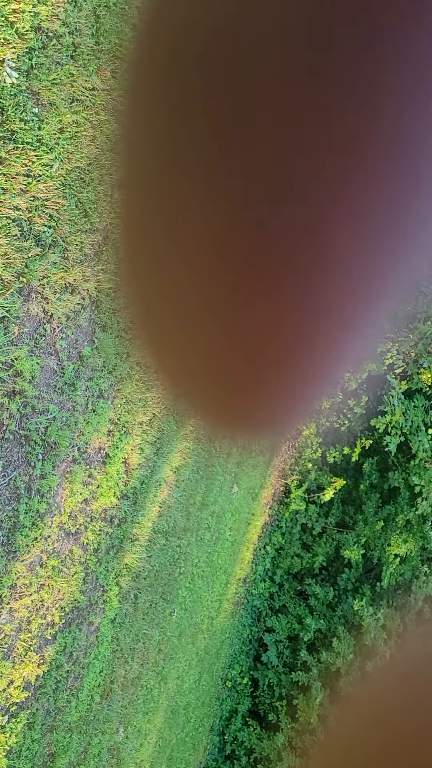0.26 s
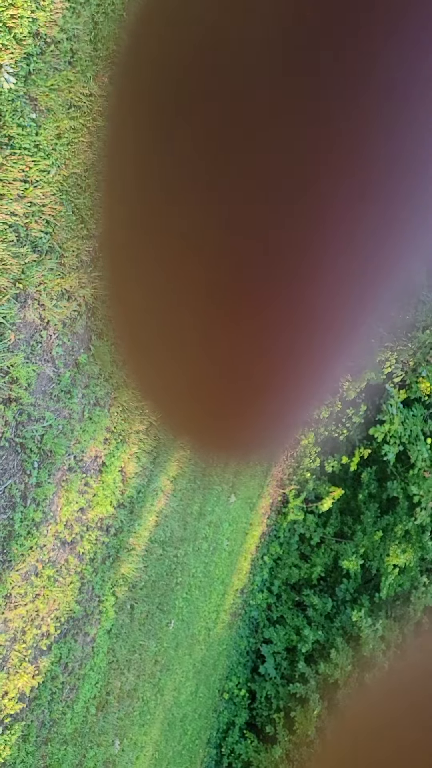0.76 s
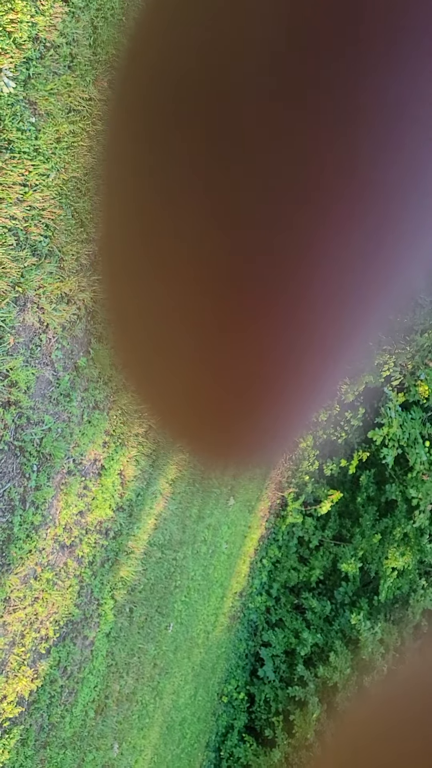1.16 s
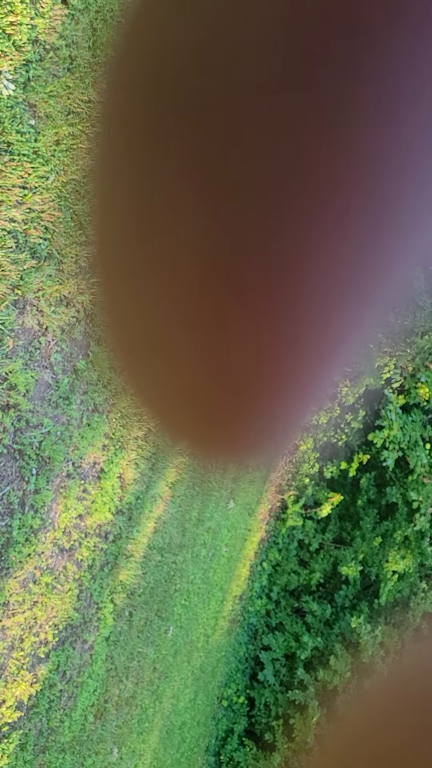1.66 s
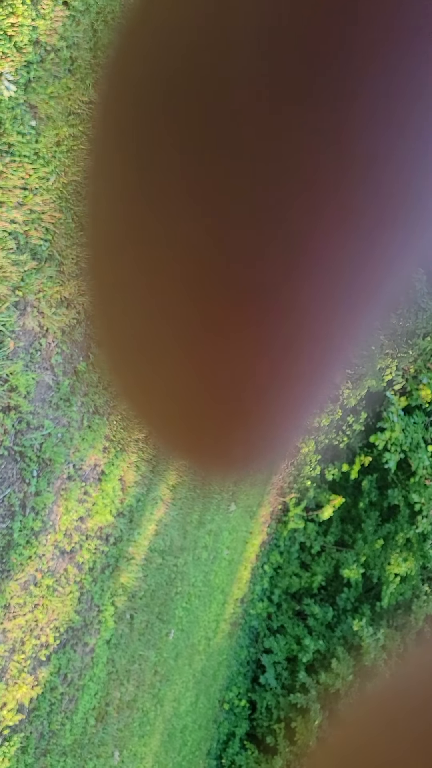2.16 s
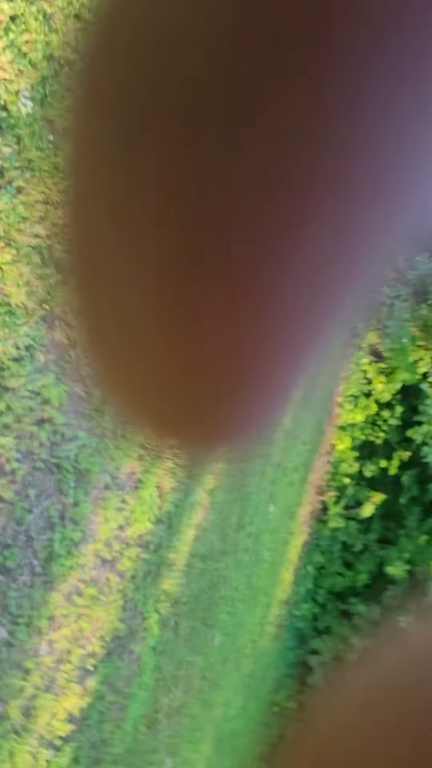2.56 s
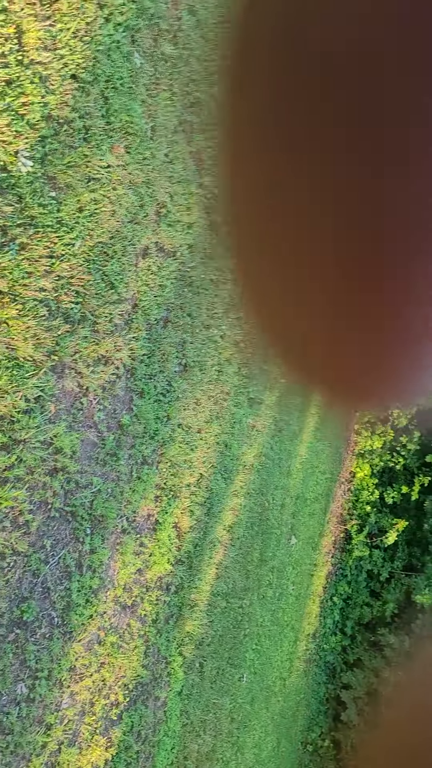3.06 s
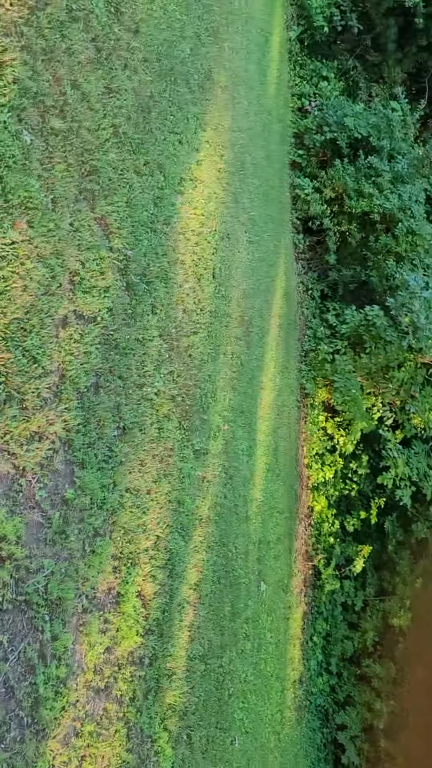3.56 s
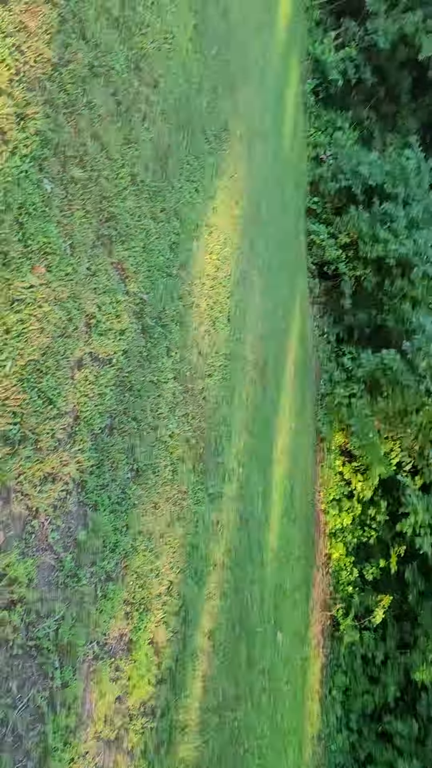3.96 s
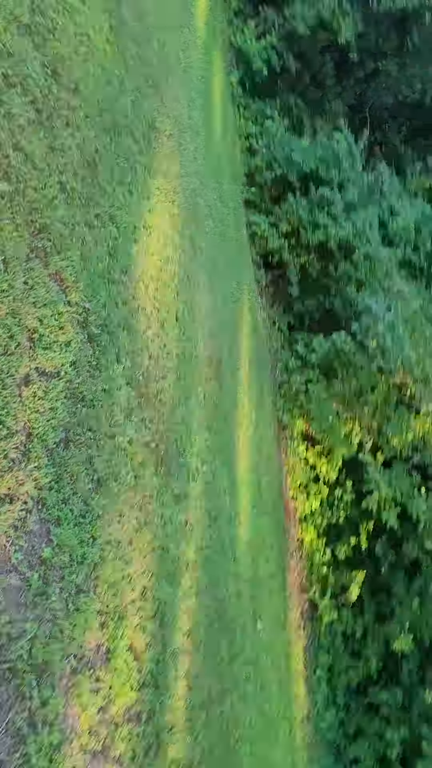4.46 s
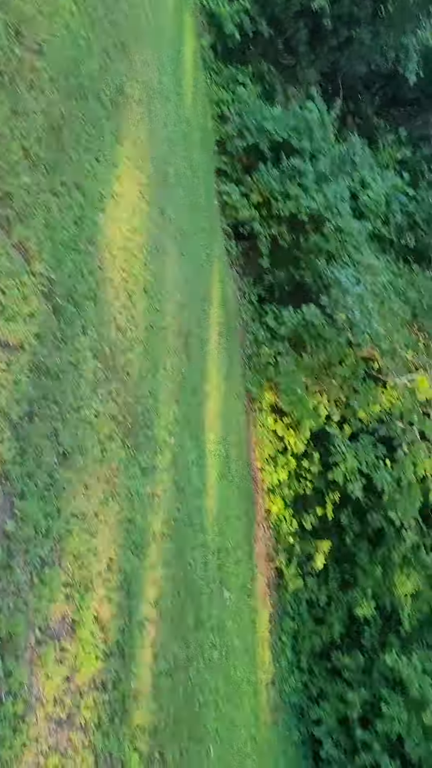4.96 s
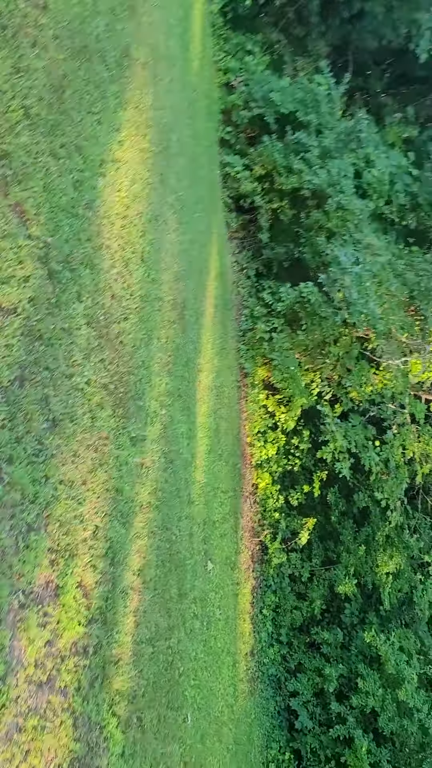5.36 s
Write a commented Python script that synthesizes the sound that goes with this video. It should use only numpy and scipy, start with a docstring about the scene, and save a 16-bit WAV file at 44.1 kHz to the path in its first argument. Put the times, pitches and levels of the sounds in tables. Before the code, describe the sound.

Fingers knock, rub and thump softly on a handheld phone's microphone in a quiet field, with faint birds far away.

```python
'''A phone is held above a quiet field at the edge of a wood: open air, a low hum, a thin high hiss.
Far birds whistle, trill and caw, scattered by the trees, and a faint plink sounds near 1 s.
From 2.6 s the hand changes its grip: fingers knock on the case, stick and slip over it with a dry
rustle and press soft thumps of air into the two microphone ports. Near 5 s a cupped palm rubs
over the left port, and a second plink comes with the last touches.'''
import sys
import numpy as np
from scipy import signal
from scipy.io import wavfile

SR = 44100
rng = np.random.default_rng(int(sys.argv[2]) if len(sys.argv) > 2 else 0)


def waveform_to_disk(signal):
    """Save audio, clipped to [-1, 1], as 16-bit WAV at the path in sys.argv[1]."""
    frames = np.transpose(np.atleast_2d(signal))
    scaled = np.clip(frames, -1, 1) * 32767
    samples = np.round(scaled).astype(np.int16)
    wavfile.write(sys.argv[1], SR, samples)


N = 247479
TIME = np.arange(N) / SR
HIT_TIME = TIME[:SR // 25]   # 40 ms, room for one knock, tick or plink
HIT_GAIN = np.sqrt(.01 * SR)   # brings a hit of unit energy to an rms of one over 10 ms


def from_db(db):
    """Decibels to gain."""
    return 10 ** (np.asarray(db) / 20)


def rms_one(x):
    """Scale to an rms of one."""
    return x / np.sqrt(np.mean(x ** 2) + 1e-20)


def unit_energy(x):
    """Scale each channel to an energy of one."""
    return x / np.linalg.norm(x, axis=-1, keepdims=True)


def in_time(rows):
    """Read each column of an automation curve at every sample."""
    time_s, *columns = np.transpose(rows)
    return [np.interp(TIME, time_s, column) for column in columns]


def at_hz(points, hz):
    """Read a spectrum on a log-frequency axis."""
    freq_hz, value = np.transpose(points)
    return np.interp(np.log(hz), np.log(freq_hz), value)


def lowpass(x, cutoff_hz, order=2):
    """Roll off the treble."""
    return signal.sosfilt(signal.butter(order, cutoff_hz, fs=SR, output="sos"), x)


def band(x, low_hz, high_hz, order=2):
    """Band-pass between two edges."""
    return signal.sosfilt(signal.butter(order, [low_hz, high_hz], "band", fs=SR, output="sos"), x)


def resonance(x, centre_hz, width_hz, order=2):
    """Band-pass around a centre."""
    return band(x, centre_hz - width_hz / 2, centre_hz + width_hz / 2, order)


def panned(pan_db):
    """Constant-power stereo gains; pan_db is left over right."""
    gains = from_db(np.array([[.5], [-.5]]) * pan_db)
    return gains / np.sqrt(np.mean(gains ** 2, axis=0))


def drift(rate_hz):
    """A random wander with an rms of one."""
    knots = rng.standard_normal(int(rate_hz * N / SR) + 3)
    return rms_one(np.interp(TIME * rate_hz, np.arange(len(knots)), knots))


def add(out, start_s, sound):
    """Mix a short sound into the stereo track."""
    start = int(start_s * SR)
    out[:, start:start + sound.shape[1]] += sound[:, :N - start]


def banded_noise(spectrum, likeness, flicker_db, flicker_hz):
    """Stereo noise in narrow bands, each with its own level, flicker and left-right likeness; rms one."""
    bottom_hz, top_hz = spectrum[0][0], spectrum[-1][0]
    edges = np.geomspace(bottom_hz, top_hz, int(np.log2(top_hz / bottom_hz) * 2.5) + 2)
    out, white = 0, rng.standard_normal((2, 2, N))
    for k, (low_hz, high_hz) in enumerate(zip(edges, edges[1:])):
        mid, side = band(white[k % 2], low_hz, high_hz, order=3)
        centre_hz = np.sqrt(low_hz * high_hz)
        alike = at_hz(likeness, centre_hz)
        gain = from_db(at_hz(spectrum, centre_hz) + flicker_db * drift(flicker_hz))
        out = out + gain * (np.sqrt(1 + alike) * mid + np.sqrt(1 - alike) * side * [[1], [-1]])
    return rms_one(out)


def open_air(wash_db=-63.5, hum_width_hz=20):
    """The bed: a steady wash of far noise, a low hum and thin, steady bands of high hiss."""
    wash_colour = [(25, -2.5), (70, -1.5), (170, -2), (310, -9), (820, -9), (1500, -25), (2500, -21.5),
                   (4600, -27.5), (6200, -40.5), (7200, -70), (15500, -47)]   # spectrum of the open air: freq_hz, relative_db
    wash_likeness = [(60, 0.84), (200, 0.43), (450, 0.059), (900, -0.41)]   # its stereo image: freq_hz, correlation
    hum_bands = [(78, -69.5), (154, -69.5)]   # the far hum: centre_hz, level_db
    hiss_bands = [(3320, 900, -77.5), (5570, 1000, -81), (8580, 1100, -97.5)]   # thin bands of high hiss: centre_hz, width_hz, level_db
    hum = sum(from_db(level_db) * rms_one(resonance(rng.standard_normal(N), hz, hum_width_hz, order=1))
              for hz, level_db in hum_bands)
    hiss = sum(from_db(level_db) * rms_one(resonance(rng.standard_normal((2, N)), hz, width_hz))
               for hz, width_hz, level_db in hiss_bands)
    wash = banded_noise(wash_colour, wash_likeness, flicker_db=.4, flicker_hz=10)
    return hum + hiss + from_db(wash_db) * wash


def whistles():
    """Birds whistle pure, wavering notes that sag in pitch."""
    # whistled notes: start_s, length_s, start_hz, end_hz, level_db, waver_share (of the pitch)
    notes = [(-.07, 0.26, 2656, 2589, -65, .007), (0.185, 0.21, 2610, 2540, -73, .008),
             (2.31, .2, 1440, 1360, -82, .035), (4.217, .034, 2850, 2720, -70, .025),
             (4.614, .15, 2886, 2680, -76.5, .018)]
    out = np.zeros(N)
    for start_s, length_s, start_hz, end_hz, level_db, waver_share in notes:
        progress = np.clip((TIME - start_s) / length_s, 0, 1)
        pitch_hz = (start_hz + (end_hz - start_hz) * progress) * (1 + waver_share * drift(90))
        swell = np.sqrt(2 * np.abs(np.sin(np.pi * progress)))
        out += from_db(level_db) * swell * np.sin(2 * np.pi * np.cumsum(pitch_hz) / SR)
    return out


def trill(buzz_share=0.16):
    """A bird's high, buzzing trill: a band of noise riding a falling tone."""
    glide = [(.33, 6700, -100), (.39, 6130, -77.5), (.45, 5320, -73), (.72, 4866, -80), (.95, 4460, -90)]   # path of the trill: time_s, centre_hz, level_db
    centre_hz, level_db = in_time(glide)
    buzz = lowpass(rng.standard_normal(N), buzz_share * centre_hz.mean(), order=3)
    tone = np.sin(2 * np.pi * np.cumsum(centre_hz) / SR)
    singing = (TIME > glide[0][0]) & (TIME < glide[-1][0])
    return singing * from_db(level_db) * rms_one(buzz * tone)


def caws(arch_share=0.06, rasp_share=0.0097):
    """A call of harmonics 2 to 5, coloured by the throat, that arches in pitch as it swells."""
    calls = [(0.953, 0.107, 556.5, -67), (2.243, 0.13, 571, -72.5)]   # the voice ahead of the throat: start_s, length_s, pitch_hz, level_db
    throat = [(550, -20), (1100, -18), (1650, -9), (2200, -4), (2800, -23)]   # response of the throat: freq_hz, gain_db
    out = np.zeros(N)
    for start_s, length_s, pitch_hz, level_db in calls:
        swell = np.abs(np.sin(np.pi * np.clip((TIME - start_s) / length_s, 0, 1)))
        bend = 1 + arch_share * (swell - 1) + rasp_share * drift(300)
        phase = 2 * np.pi * np.cumsum(pitch_hz * bend) / SR
        voice = sum(from_db(at_hz(throat, k * pitch_hz)) * np.sin(k * phase) for k in range(2, 6))
        out += from_db(level_db) * np.sqrt(swell) * voice
    return out


def wood(call, tail_db, t60_s=0.8):
    """Trunks and leaves scatter a call into a smooth tail, different on each side."""
    tail = unit_energy(rng.standard_normal((2, SR)) * from_db(-60 * TIME[:SR] / t60_s))
    return call + from_db(tail_db) * signal.fftconvolve(call[None], tail, axes=1)[:, :N]


def far_birds(dip_share=0.65):
    """The calls carry through the wood and reach the ports with a narrow dip in the treble."""
    calls = wood(whistles() + trill(), tail_db=6.5) + wood(caws(), tail_db=-6)
    return calls - dip_share * resonance(calls, centre_hz=4800, width_hz=320, order=1)


def plinks(ring_s=0.0047):
    """Faint single tones that die at once."""
    tones = [(.953, 947, -53), (5.510, 780, -50.5)]   # brief rings: start_s, pitch_hz, peak_db
    out, ring = np.zeros((2, N)), np.exp(-HIT_TIME / ring_s)
    for start_s, pitch_hz, peak_db in tones:
        add(out, start_s, from_db(peak_db) * ring * np.sin(2 * np.pi * pitch_hz * HIT_TIME)[None])
    return out


def wide_stereo(sound, lag_s=0.0002):
    """The sound spreads wide: the right channel is inverted and slightly later."""
    t = TIME[:len(sound)]
    return np.array([sound, -np.interp(t - lag_s, t, sound, left=0)])


def pressure(start_s, length_s, attack_s=0.0053, release_s=0.0088, arch_db=3):
    """Envelope of one stroke: it sets in quickly, presses hardest halfway and lets go."""
    t = TIME - start_s
    arch = np.sin(np.pi * np.clip(t / length_s, 0, 1)) - 2 / np.pi
    edges = np.minimum(t, 0) / attack_s - np.maximum(t - length_s, 0) / release_s
    return from_db(arch_db * arch) * np.exp(np.maximum(edges, -20))


def cupped_rubs(pan_db=9):
    """A cupped palm rubs over the left port; its friction rings in the pocket of air under it."""
    rubs = [(4.858, 0.11, -46.5), (4.942, 0.1, -42.5)]   # pushes of the palm: start_s, length_s, drive_db
    pocket_modes = [(541, 120, 1.5), (824, 190, -8), (1250, 130, -10), (2300, 290, -17.5),
                    (4130, 600, -15.5)]   # resonances of the pocket: centre_hz, width_hz, gain_db
    push = np.max([from_db(drive_db) * pressure(start_s, length_s)
                   for start_s, length_s, drive_db in rubs], axis=0)
    friction = rng.standard_normal(N)
    pocket = sum(from_db(gain_db) * rms_one(resonance(friction, hz, width_hz))
                 for hz, width_hz, gain_db in pocket_modes)
    return panned(pan_db) * wide_stereo(push * pocket)


def hollow_case(rub):
    """The cavities of the case lift a few narrow bands of a rub."""
    cavities = [(556, 450, -4), (1305, 94, -4.5), (2165, 80, -6), (3060, 120, 1)]   # their resonances: centre_hz, width_hz, gain_db
    return rub + sum(from_db(gain_db) * resonance(rub, hz, width_hz, order=1)
                     for hz, width_hz, gain_db in cavities)


def slides(grip_db=2.0, grip_hz=350, creep_pan_db=2.5, creep_fade_s=0.012):
    """Skin sticks and slips on the case; quick changes of grip roughen all bands together."""
    # finger strokes: start_s, length_s, body_db, rustle_over_body_db, hiss_over_rustle_db, pan_db
    strokes = [(2.654, 0.043, -49.5, -11.5, -10.5, 4), (3.213, 0.066, -59, -8.5, -18, 10),
               (3.31, .03, -45.5, -4, -23, 11), (3.336, 0.022, -37, -5, -15, 5),
               (3.549, 0.014, -29.5, -5, -10, 7.5), (3.648, 0.14, -48, 0.5, -6.5, 1),
               (3.852, 0.11, -45.5, -7.5, -14, 5), (3.895, 0.036, -38, -7.5, -13, 4.5),
               (4.115, 0.02, -51, 2, -10.5, -2), (4.198, 0.061, -50, -12, -13, 2.5),
               (4.289, 0.021, -45, -2, -15, 4), (4.427, 0.069, -45.5, -13, -26, -3),
               (4.465, 0.075, -38, -1.5, -15.5, 9.5), (4.71, 0.012, -38, -6, -11, 11),
               (4.858, 0.076, -52, -6.5, -12, 11), (4.952, 0.094, -50.5, -4, -12, 12.5),
               (5.128, 0.024, -51, -15, -6, 0), (5.237, 0.035, -47, -7.5, -8.5, 4.5),
               (5.306, 0.029, -59.5, 1.5, -9.5, 1.5)]
    creep_curve = [(3.6, -63), (3.74, -53.5), (4.056, -62.5), (4.4, -60), (4.542, -69), (4.776, -71.5),
                   (5.048, -61), (5.302, -63), (5.42, -61)]   # the hand creeping lightly between strokes: time_s, drive_db
    # low, middle and high colours of the friction: freq_hz, relative_db
    body_colour = [(110, -1), (190, 4), (300, -1), (520, -4.5), (1050, -10), (2100, -29)]
    rustle_colour = [(900, -5.5), (1400, -2), (2300, 2.5), (3200, -3), (4400, -4.5), (5800, -13),
                     (8000, -47)]
    hiss_colour = [(4200, 5), (6200, 13), (8000, 6), (11000, -5), (15500, -17)]
    likeness = [(100, 0.49), (220, -0.32), (500, -0.52), (1000, -0.58), (3000, -0.19)]   # stereo image of the friction: freq_hz, correlation
    creep_db, = in_time(creep_curve)
    inside_s = np.minimum(TIME - creep_curve[0][0], creep_curve[-1][0] - TIME)
    creep = from_db(creep_db) * np.clip(inside_s / creep_fade_s, 0, 1)
    # the body travels through the case to both ports, the treble favours the nearer one
    body = panned(.5 * creep_pan_db) * from_db(3) * creep
    rustle = panned(creep_pan_db) * from_db(-3.5) * creep
    hiss = panned(creep_pan_db) * from_db(-16.5) * creep
    for start_s, length_s, body_db, rustle_over_body_db, hiss_over_rustle_db, pan_db in strokes:
        lingering = pressure(start_s, length_s, release_s=0.011)   # the lows outlast the treble
        body = np.maximum(body, panned(.5 * pan_db) * from_db(body_db) * lingering)
        treble = panned(pan_db) * from_db(body_db + rustle_over_body_db) * pressure(start_s, length_s)
        rustle = np.maximum(rustle, treble)
        hiss = np.maximum(hiss, from_db(hiss_over_rustle_db) * treble)
    grip = rms_one(from_db(grip_db * drift(grip_hz)))
    body *= banded_noise(body_colour, likeness, flicker_db=1.5, flicker_hz=29)
    rustle *= banded_noise(rustle_colour, likeness, flicker_db=2.5, flicker_hz=50)
    hiss *= banded_noise(hiss_colour, likeness, flicker_db=0.5, flicker_hz=95)
    return grip * (hollow_case(body + rustle) + hiss)


def port_thumps(port_hz=74.6, quick_press_s=0.0068):
    """A fingertip closes on a port and lifts: a short, low swell of pressure."""
    presses = [(2.626, -40.5, 0.0029, 3), (2.67, -45, 0.0066, 2), (2.697, -45, 0.0016, 2),
               (3.343, -26, 0.0023, -22), (3.37, -21.5, 0.0025, 8), (3.564, -23.5, 0.006, 21),
               (3.574, -32.5, 0.013, -15), (3.595, -32, 0.011, 5), (3.672, -28.5, 0.01, -10.5),
               (3.906, -26.5, 0.0025, -30), (4.468, -29, 0.004, 10), (4.55, -32.5, 0.014, 7),
               (4.719, -30.5, 0.0056, 14), (5.252, -33.5, 0.0035, 4), (5.481, -40, 0.0023, 6.5)]   # air pressed into the ports: peak_s, peak_db, half_width_s, pan_db
    out = np.zeros((2, N))
    for peak_s, peak_db, half_width_s, pan_db in presses:
        t = TIME - peak_s
        # a slow press swings at the port's own pitch, a quicker one higher
        pitch_hz = port_hz * max(1, quick_press_s / half_width_s) ** 0.77
        swell = np.exp(-.5 * (t / half_width_s) ** 2)
        out += panned(pan_db) * from_db(peak_db) * swell * np.cos(2 * np.pi * pitch_hz * t)
    return out


def crackle(low_hz, high_hz, order, decay_s=0.0012):
    """A burst of tiny slips of skin, of unit energy in each channel."""
    slips = rng.standard_normal((2, len(HIT_TIME))) * np.exp(-HIT_TIME / decay_s)
    return unit_energy(lowpass(band(slips, low_hz, high_hz, order), cutoff_hz=7000))


def skin_ticks():
    """Skin peels off the case with a tiny, high tick."""
    peels = [(2.05, -66.5), (2.138, -75), (2.576, -61.5), (3.519, -52), (4.369, -61.5)]   # skin letting go: start_s, level_db
    out = np.zeros((2, N))
    for start_s, level_db in peels:
        add(out, start_s, HIT_GAIN * from_db(level_db) * crackle(low_hz=5050, high_hz=6640, order=2))
    return out


def finger_knocks(midway_hz=408.4, hz_per_pan_db=14, knock_spread=1.368, tick_hz=3100, tick_spread=1.18,
                  rebound_hz=290, rebound_s=0.0018, rebound_db=-7, ring_db=0.5):
    """A finger lands: a tick of skin, a damped swing of the case, then a lower rebound in the hand."""
    landings = [(2.6042, -47.5, -52.5, 4), (2.6215, -41.5, -52.5, 3.5), (3.203, -45.5, -64, 4.5),
                (3.314, -30, -58, 4), (3.341, -24.5, -35.5, 8), (3.3579, -24.5, -47, 0),
                (3.638, -38.5, -43, -7.5), (3.874, -24.5, -49, 3), (3.9027, -18, -32, -7.5),
                (3.993, -46, -54, -6), (4.4636, -14, -64, 6), (4.495, -26.5, -49, 7),
                (4.697, -39, -46, 2.5), (4.83, -50, -65.5, 7), (4.949, -27.5, -53, 4),
                (5.099, -39, -56.5, 5.5), (5.2754, -39, -51, -10.5), (5.471, -41, -62, 4)]   # fingers meeting the case: start_s, knock_db, tick_db, pan_db
    out = np.zeros((2, N))
    blow = lowpass(signal.unit_impulse(len(HIT_TIME)), cutoff_hz=2400)   # softened by the skin
    rebound = band(blow, rebound_hz / 1.32, rebound_hz * 1.11)
    rebound = from_db(rebound_db) * unit_energy(np.interp(HIT_TIME - rebound_s, HIT_TIME, rebound, left=0))
    for start_s, knock_db, tick_db, pan_db in landings:
        knock_hz = midway_hz + hz_per_pan_db * pan_db   # higher towards the left end of the case
        swing = unit_energy(band(blow, knock_hz / knock_spread, knock_hz * knock_spread))
        knock = from_db(knock_db) * wide_stereo(swing + rebound)
        slips = crackle(tick_hz / tick_spread, tick_hz * tick_spread, order=1)
        port_ring = resonance(slips, centre_hz=3054, width_hz=190, order=1)   # the port's channel rings
        tick = from_db(tick_db) * unit_energy(slips + from_db(ring_db) * port_ring)
        add(out, start_s, HIT_GAIN * panned(pan_db) * (knock + tick))
    return out


def scene():
    """The hand on the phone, close up, in front of the quiet field."""
    foreground = finger_knocks() + skin_ticks() + plinks() + slides() + cupped_rubs() + port_thumps()
    return foreground + far_birds() + open_air()


def record(dry, cutoff_hz=15750):
    """A steep low-pass takes off the very top."""
    return signal.sosfilt(signal.ellip(10, .1, 70, cutoff_hz, fs=SR, output="sos"), dry)


dry = scene()
out = record(dry)
waveform_to_disk(out)
```